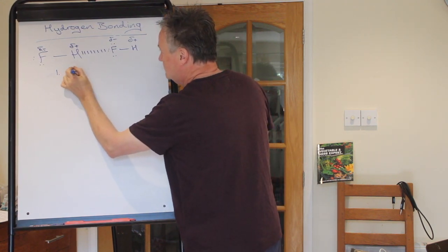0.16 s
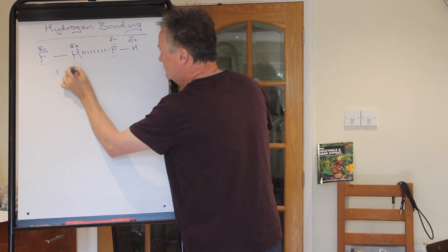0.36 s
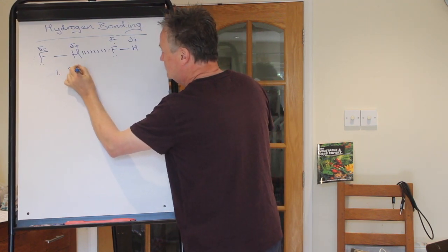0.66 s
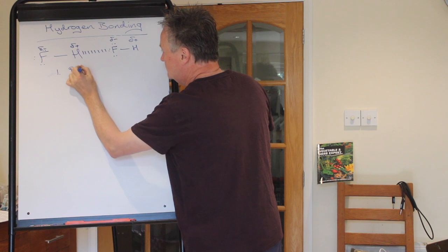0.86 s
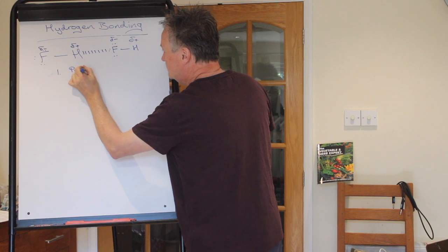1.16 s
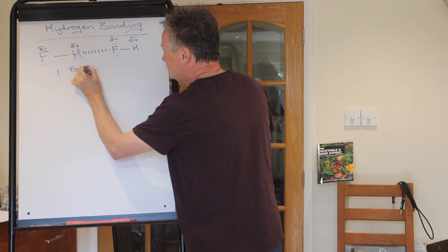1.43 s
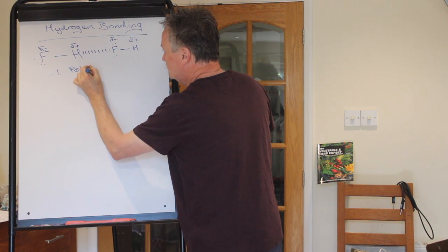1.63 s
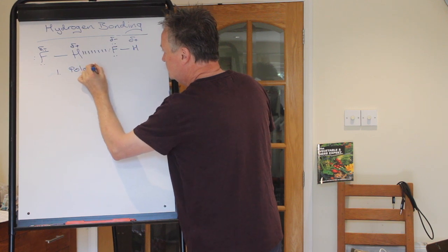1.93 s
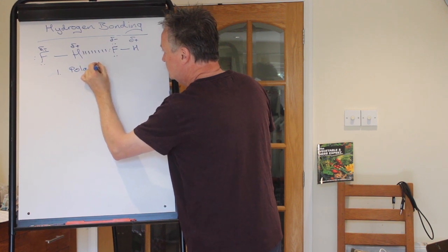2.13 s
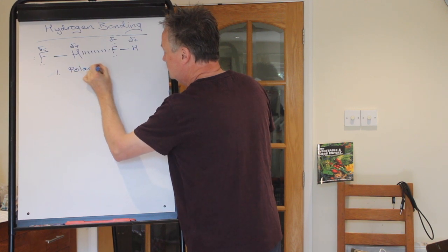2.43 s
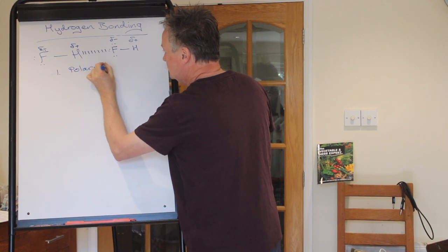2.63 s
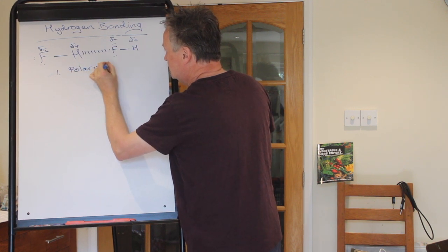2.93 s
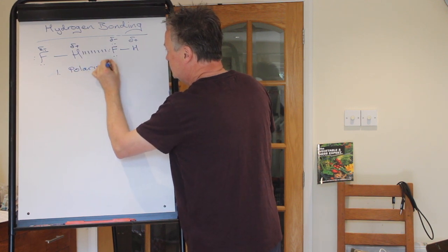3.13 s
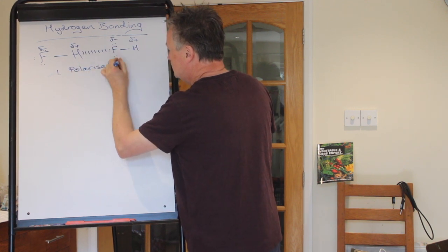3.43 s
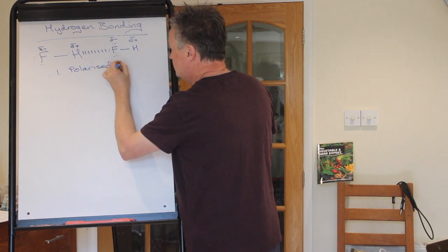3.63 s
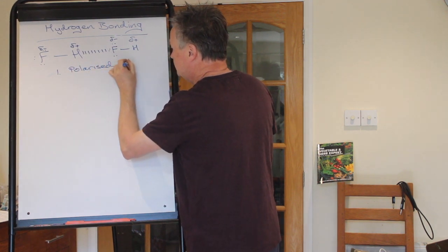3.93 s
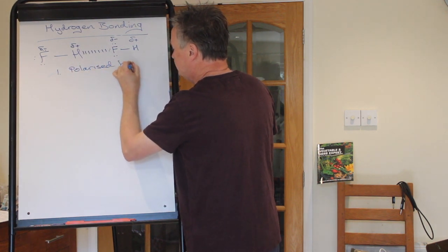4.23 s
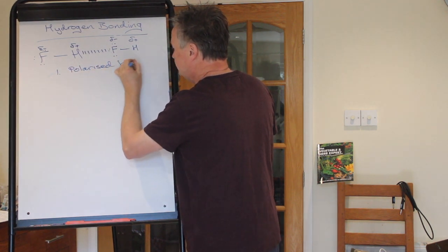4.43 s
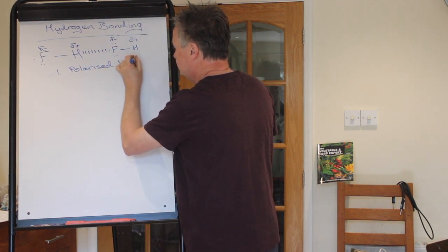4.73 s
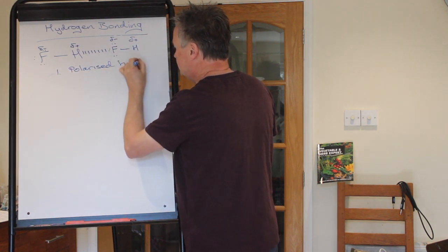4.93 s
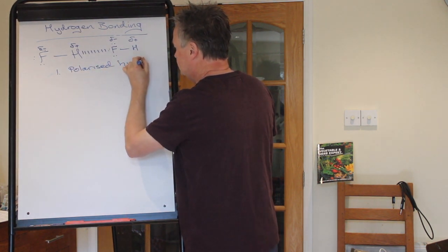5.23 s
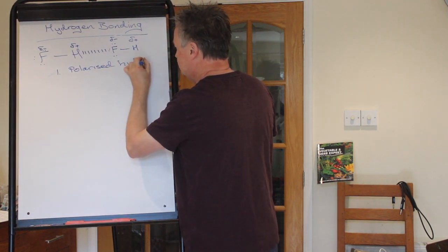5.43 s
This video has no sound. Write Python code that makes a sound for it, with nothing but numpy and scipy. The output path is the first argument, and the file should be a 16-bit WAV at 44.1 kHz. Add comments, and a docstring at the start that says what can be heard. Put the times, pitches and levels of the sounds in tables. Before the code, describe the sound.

A felt marker writes on a whiteboard standing on an easel. The tip lands with soft, hollow knocks about twice a second, some with a tiny plastic tick, and between them it rubs across the glossy surface in short, faint hisses. The firmest knock comes about two seconds in. One microphone picks it up in a small quiet room, with low rumble, hiss and a faint high whine.

```python
"""A felt marker writes a word on a whiteboard on an easel, heard on one microphone in a small quiet room.
Each touch of the nib thumps the panel and ticks the pen's barrel; the near walls and the room answer.
Between touches the felt catches and slips over the gloss, hissing with each sweep of the hand.
Under it lie room rumble and the camera's own hiss, thin buzz and faint whine."""
import sys
import numpy as np
from scipy import signal
from scipy.fft import rfft, irfft, next_fast_len
from scipy.io import wavfile
from scipy.ndimage import uniform_filter1d, map_coordinates

SR = 44100
rng = np.random.default_rng(int(sys.argv[2]) if len(sys.argv) > 2 else 0)


def materialize(psi):
    """Save the field psi as 16-bit PCM at rate SR to the path in sys.argv[1].

    A 1-D psi becomes a single channel; in a 2-D psi each row is a channel.
    """
    bounded = np.clip(np.atleast_2d(psi).T, -1, 1)
    quanta = np.round(bounded * 32767).astype(np.int16)
    wavfile.write(sys.argv[1], SR, quanta)


N = 245592

# Levels are relative unless marked rms; a density is a level per hertz.
# room rumble and microphone hiss: frequency_hz, density_db
ROOM_TONE = [(20, -3.5), (48, -2.5), (75, 0), (130, 1), (300, 1.5), (500, -1), (1000, -4.5), (2500, -8),
             (5000, -12), (7500, -19.5), (9500, -20), (12000, -25), (15000, -33.5)]
# lines of the camera's buzz: pitch_hz, rms_db
BUZZ_LINES = [(4097, -81), (4893, -79), (5093, -80), (5895, -83), (6691, -80), (7289, -77), (7693, -76),
              (7892, -80), (7989, -79), (8489, -81), (9588, -91), (9690, -87), (10487, -92), (10589, -91),
              (10686, -91), (11084, -91), (11488, -92), (11585, -93), (11886, -95), (12285, -95)]
# brief swells of the whine: peak_s, length_s, rms_db
WHINE_SWELLS = [(0.555, 0.093, -61.5), (0.815, 0.035, -64), (0.953, 0.045, -62), (1.315, 0.04, -62),
                (1.675, 0.027, -64), (3.905, 0.11, -66.5), (4.66, 0.015, -60), (4.76, 0.11, -62.5),
                (4.88, 0.04, -61), (5.016, 0.1, -64), (5.5, 0.076, -63.5)]

# sweeps of the hand, each a line or the arc of a letter: fastest_s, length_s, level_db
SWEEPS = [(0.065, 0.11, -56.5), (0.4, 0.075, -58.5), (0.5, 0.16, -59), (0.59, 0.093, -61.5),
          (0.93, 0.088, -61.5), (1.19, 0.095, -59.5), (1.3, 0.11, -59), (1.39, 0.047, -60),
          (1.5, 0.16, -59), (1.65, 0.1, -63), (1.81, 0.085, -57), (2.23, .1, -65), (2.34, 0.071, -57.5),
          (2.405, .07, -56.5), (2.595, .06, -66.5), (2.69, 0.099, -60.5), (2.78, 0.11, -64.5),
          (2.865, 0.077, -59), (3.02, 0.037, -60), (3.17, .17, -58), (3.28, 0.077, -63), (3.375, .09, -58),
          (3.55, 0.084, -63), (3.63, 0.066, -59), (3.78, 0.19, -60), (4.11, 0.08, -60.5),
          (4.185, .05, -61.5), (4.29, 0.086, -61.5), (4.38, 0.09, -56.5), (4.59, 0.084, -62),
          (4.77, .19, -57), (4.97, .11, -55.5), (5.12, .09, -62.5), (5.28, 0.083, -56),
          (5.47, 0.091, -60.5)]
# hiss of felt on gloss: frequency_hz, density_db
FELT_SPECTRUM = [(800, -5.5), (1800, -7), (2800, -4.5), (4000, -9), (5300, -7.5), (6600, 3), (7600, 2),
                 (8500, -2), (9500, -10.5), (12000, -23), (15500, -39)]
# scratchy side of the rub: frequency_hz, density_db
SCRATCH_SPECTRUM = [(1500, -16), (2800, -9), (4300, 3), (5400, -1), (6400, -4), (9000, -28)]
# strength of that scratch through the word: time_s, level_db
SCRATCH_CURVE = [(0, -11), (0.6, -16), (1.5, -9), (2.35, -11), (2.9, -10), (3.6, -3.5), (4.3, -9),
                 (4.8, -5.5), (5.5, -10)]
# murmur of the panel under the moving nib: frequency_hz, density_db
MURMUR_SPECTRUM = [(60, -16), (140, 2), (320, -0.5), (600, -10), (1200, -6), (3000, -36)]

# the nib lands, brighter when quick and hard: start_s, force_db, cutoff_hz, bass_db, tick_db
LANDINGS = [(0.334, -9, 410, -0.5, -72), (0.829, -14.5, 255, -4.5, -72), (1.1031, -10.5, 390, 3, -70),
            (1.9493, 0.5, 952, -1.5, -52.5), (2.159, -3, 933, 3, -62), (2.551, -10, 260, -2.5, -74),
            (2.993, -2.5, 626, 0, -69), (3.5121, -3, 522, -3.5, -70), (3.9815, -5, 620, -1, -69),
            (4.532, -7.5, 630, -1, -70), (5.425, -2.5, 773, -2.5, -67)]
# tick of the plastic barrel: frequency_hz, density_db
BARREL_SPECTRUM = [(1200, -26), (2500, -22), (4000, -0.5), (5200, -1), (6500, 8), (7800, 1), (9000, -12),
                   (15000, -37)]
# paths to the microphone, straight and off near surfaces: delay_s, level_db, pitch_hz, t60_s
THUD_PATHS = [(0, 0.5, 332, 0.018), (.0066, 1, 384, 0.035), (0.0248, -3, 475, .008),
              (0.0333, -8, 446, 0.011)]
# modes of the panel and the room around it: pitch_hz, level_db, t60_s
PANEL_MODES = [(48, -56, 1), (68.5, -54.5, 0.54), (127.1, -39.5, 0.26), (141.9, -38, 0.32),
               (199.4, -34, 0.34), (215.9, -39, 0.41), (254, -53, 0.74), (274.4, -40.5, 0.49),
               (300.1, -31.5, 0.23), (310, -34.5, 0.28), (336.3, -35.5, 0.39), (361.5, -31.5, 0.36),
               (401, -30.5, 0.33), (428.7, -35.5, 0.32), (475, -38.5, 0.45), (490, -33.5, 0.27),
               (526.4, -27.5, 0.26), (583, -38, 0.21), (594, -42, 0.37), (607, -39, 0.36), (655, -60, 0.25),
               (699, -41.5, 0.46), (739, -43.5, 0.34), (795, -53.5, 0.31), (1023, -37.5, 0.37),
               (1056, -36, 0.24), (1386, -42, 0.22), (1578, -29.5, 0.28), (1800, -41, 0.24)]
# diffuse ring after a blow: frequency_hz, density_db
RING_SPECTRUM = [(25, -13), (120, -12.5), (250, -5), (400, -1.5), (600, -2), (850, -0.5), (1100, -4),
                 (1250, -4.5), (1500, 2.5), (2200, 4.5), (4000, 18), (8000, -10)]
# decay of that ring: frequency_hz, t60_s
RING_DECAY = [(100, 0.58), (400, 0.48), (900, 0.27), (2000, 0.34), (8000, 0.16)]


def amp(db):
    """Decibels to gain."""
    return 10 ** (np.asarray(db) / 20)


def unit(x):
    """x scaled to rms 1."""
    return x / np.sqrt(np.mean(x ** 2) + 1e-20)


def along(points, hz):
    """A table of frequency_hz, value read at hz on a log axis."""
    frequencies, values = np.transpose(points)
    return np.interp(np.log(hz + 1), np.log(frequencies), values)


def wobble(rate_hz):
    """A smooth random curve with rate_hz knots a second."""
    knots = rng.standard_normal(int(N * rate_hz / SR) + 4)
    return map_coordinates(knots, [np.arange(N) * rate_hz / SR])


def bell(peak_s, length_s, shape):
    """A swell above half strength for length_s; shape 2 is round, less is sharper with longer flanks."""
    return 0.5 ** (np.abs(2 * (np.arange(N) / SR - peak_s) / length_s) ** shape)


def filtered(x, response):
    """x through a complex frequency response."""
    size = next_fast_len(len(x) + 8192)
    hz = np.fft.rfftfreq(size, 1 / SR)
    return irfft(rfft(x, size) * response(hz), size)[:len(x)]


def coloured(x, spectrum):
    """x shaped by a spectrum table, at rms 1."""
    return unit(filtered(x, lambda hz: amp(along(spectrum, hz))))


def room_tone(rms_db):
    """The room's steady rumble and the microphone's own hiss."""
    return amp(rms_db) * coloured(rng.standard_normal(N), ROOM_TONE)


def camera_buzz():
    """The camera's electronics give a thin buzz of steady high tones."""
    t = np.arange(N) / SR
    return np.sqrt(2) * sum(amp(db) * np.sin(2 * np.pi * (hz * t + rng.random())) for hz, db in BUZZ_LINES)


def camera_whine(pitch_hz, steady_db):
    """A faint pure tone from the camera that now and then swells."""
    level = amp(steady_db)
    for peak_s, length_s, rms_db in WHINE_SWELLS:
        level = np.maximum(level, amp(rms_db) * bell(peak_s, length_s, shape=2.4))
    return np.sqrt(2) * level * np.sin(2 * np.pi * pitch_hz * np.arange(N) / SR)


def hand_friction(creep_db, tremor_db):
    """Friction follows the hand's speed and unsteady pressure; between sweeps the nib only creeps."""
    sweep_power = sum((amp(db) * bell(peak_s, length_s, shape=1.3)) ** 2 for peak_s, length_s, db in SWEEPS)
    pressure = amp(tremor_db * wobble(rate_hz=30))
    return np.sqrt(amp(creep_db) ** 2 + sweep_power) * pressure


def nib_resonances(x, depth_db):
    """Narrow resonances of the nib come and go as it rolls and turns."""
    spectra = signal.stft(x, nperseg=512)[2]
    patches = uniform_filter1d(rng.standard_normal(spectra.shape), size=3, axis=0)  # across frequency
    patches = uniform_filter1d(patches, size=12, axis=1)  # across time
    return signal.istft(spectra * amp(depth_db * unit(patches)), nperseg=512)[1][:len(x)]


def felt_strokes(hiss_db, murmur_db, grain_db):
    """Felt fibres catch and slip: a fine hiss, a coarser scratch and a low murmur in the panel."""
    slips = rng.standard_normal(N) * amp(grain_db * wobble(rate_hz=1500))
    hiss = amp(hiss_db) * coloured(nib_resonances(slips, depth_db=2.5), FELT_SPECTRUM)
    murmur = amp(murmur_db) * coloured(rng.standard_normal(N), MURMUR_SPECTRUM)
    scratch_db = np.interp(np.arange(N) / SR, *np.transpose(SCRATCH_CURVE))
    rasp = nib_resonances(rng.standard_normal(N), depth_db=3)
    scratch = amp(scratch_db) * coloured(rasp, SCRATCH_SPECTRUM)
    return hand_friction(creep_db=-71, tremor_db=0.35) * (hiss + scratch + murmur)


def barrel_tick(t, t60_s, room_db, room_t60_s):
    """The pen's plastic barrel ticks, and the room holds it briefly."""
    fade = amp(-60 * t / t60_s) + amp(room_db - 60 * t / room_t60_s)
    return fade * coloured(rng.standard_normal(len(t)), BARREL_SPECTRUM)


def diffuse_ring(t, rise_s):
    """Countless higher modes and wall echoes blur together, the treble dying first."""
    band_hz, age_s, spectra = signal.stft(rng.standard_normal(len(t)), SR, nperseg=512)
    decay = amp(-60 * age_s / along(RING_DECAY, band_hz)[:, None])
    tail = signal.istft(spectra * decay, SR, nperseg=512)[1][:len(t)]
    return filtered(tail, lambda hz: amp(along(RING_SPECTRUM, hz))) * (1 - np.exp(-t / rise_s))


def panel_modes(t, spread_db, rise_s):
    """Neighbouring modes swing in opposite senses; each spot excites them a little differently."""
    pitch_hz, level_db, t60_s = np.transpose(PANEL_MODES)[:, :, None]
    sense = (-1) ** np.arange(len(pitch_hz))[:, None]
    struck_db = level_db + spread_db * rng.standard_normal(pitch_hz.shape)
    modes = sense * amp(struck_db - 60 * t / t60_s) * np.sin(2 * np.pi * pitch_hz * t)
    return modes.sum(0) * (1 - np.exp(-t / rise_s))


def panel_thud(t, bass_cut_hz):
    """The panel's short thud reaches the microphone straight, then again off each near surface."""
    thud = np.zeros(len(t))
    for delay_s, level_db, pitch_hz, t60_s in THUD_PATHS:
        age_s = np.maximum(t - delay_s, 0)
        thud -= amp(level_db - 60 * age_s / t60_s) * np.sin(2 * np.pi * pitch_hz * age_s)
    # an open panel radiates little bass: the air slips round its edges
    return filtered(thud, lambda hz: (1j * hz / (bass_cut_hz + 1j * hz)) ** 2)


def landing_spot(x, bass_db, shelf_hz):
    """Where the nib lands decides how strongly the panel's low, wide bending waves are driven."""
    return filtered(x, lambda hz: (amp(bass_db) + 1j * hz / shelf_hz) / (1 + 1j * hz / shelf_hz))


def marker_taps(thud_db, modes_db, ring_db):
    """Each landing ticks the barrel and drives the panel through the soft nib, which rounds the blow."""
    t = np.arange(SR // 2) / SR
    taps = np.zeros(N + SR)
    for start_s, force_db, cutoff_hz, bass_db, tick_db in LANDINGS:
        panel = amp(thud_db) * panel_thud(t, bass_cut_hz=83)
        panel += amp(modes_db) * panel_modes(t, spread_db=0.5, rise_s=0.016)
        panel += amp(ring_db) * diffuse_ring(t, rise_s=0.0028)
        panel = landing_spot(panel, bass_db, shelf_hz=280)
        soft_nib = signal.butter(4, cutoff_hz, fs=SR, output="sos")
        thump = amp(force_db) * signal.sosfilt(soft_nib, panel)
        tick = amp(tick_db) * barrel_tick(t, t60_s=0.056, room_db=-1, room_t60_s=0.47)
        taps[round(start_s * SR):][:len(t)] += thump + tick
    return taps[:N]


def scene():
    """The marker's taps and strokes over the quiet of the small room, in mono."""
    taps = marker_taps(thud_db=-18, modes_db=0.5, ring_db=-14)
    strokes = felt_strokes(hiss_db=2, murmur_db=-12, grain_db=1)
    background = room_tone(rms_db=-55) + camera_buzz() + camera_whine(pitch_hz=2205, steady_db=-73.5)
    return (taps + strokes + background)[None]


def record(dry):
    """The camera keeps nothing above its band limit."""
    return filtered(dry[0], lambda hz: hz < 15500)[None]


dry = scene()
out = record(dry)
materialize(out)
```